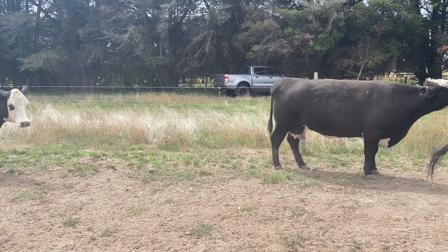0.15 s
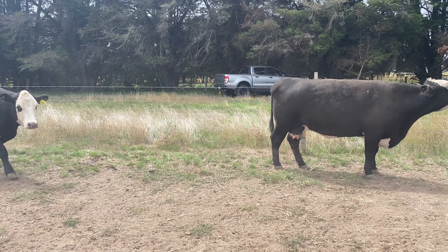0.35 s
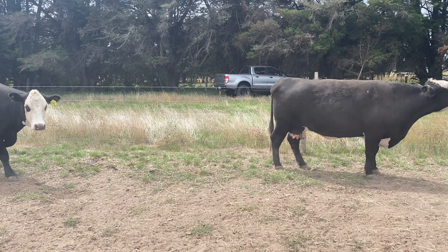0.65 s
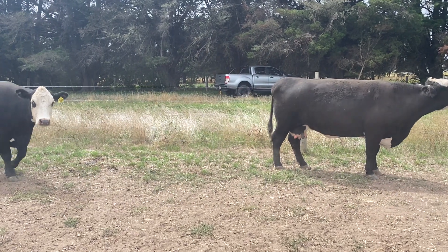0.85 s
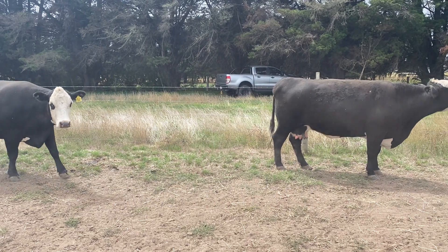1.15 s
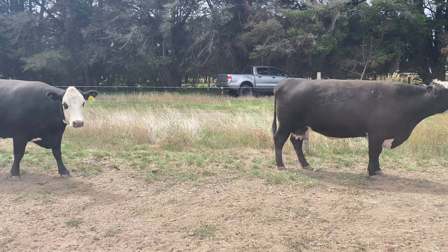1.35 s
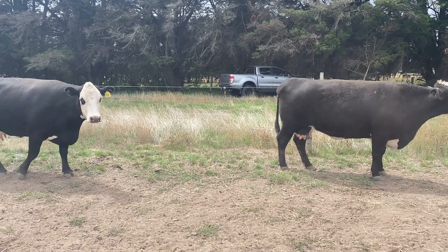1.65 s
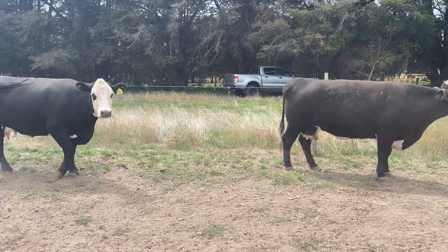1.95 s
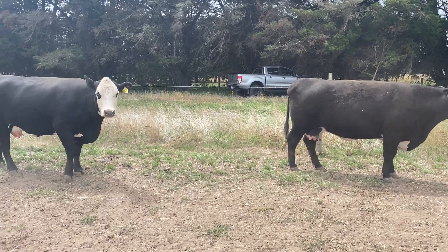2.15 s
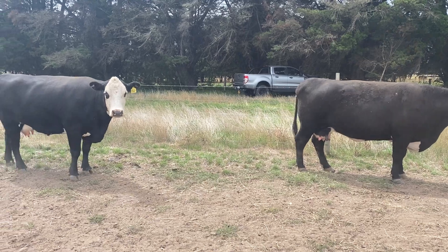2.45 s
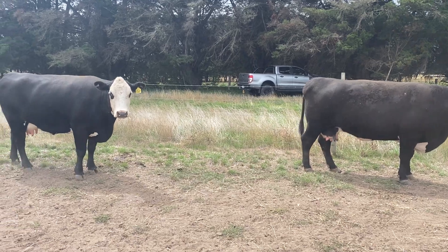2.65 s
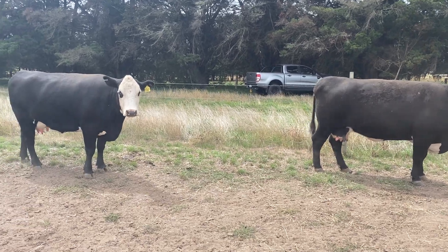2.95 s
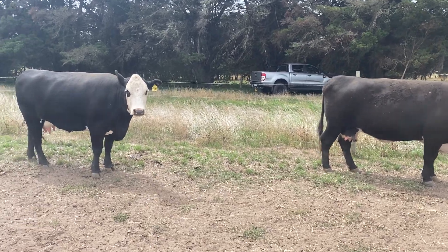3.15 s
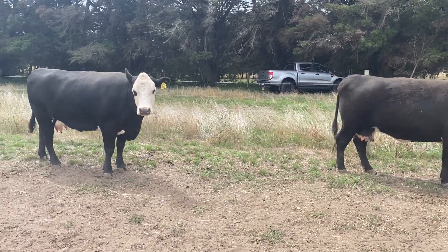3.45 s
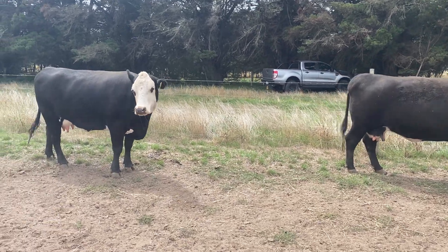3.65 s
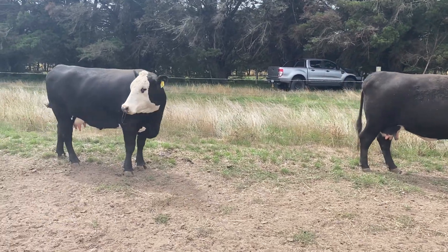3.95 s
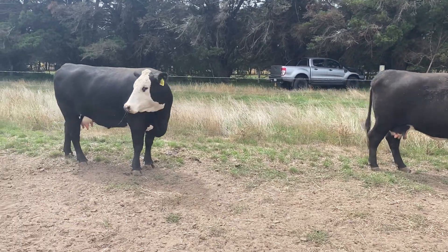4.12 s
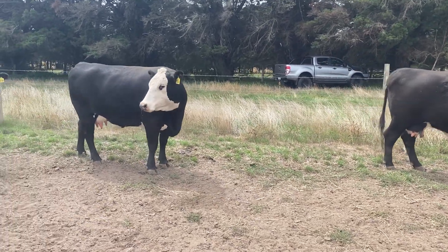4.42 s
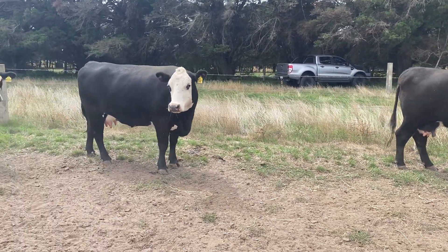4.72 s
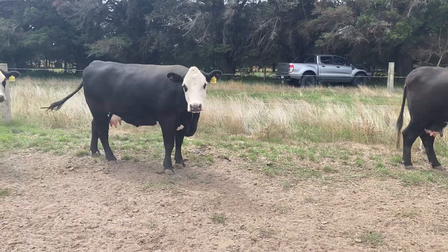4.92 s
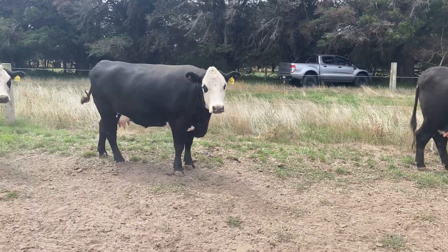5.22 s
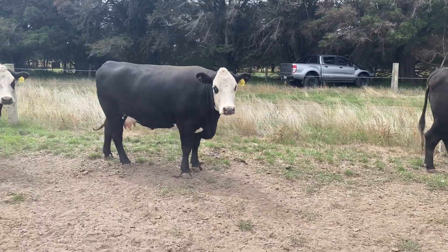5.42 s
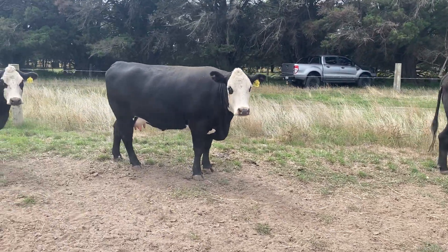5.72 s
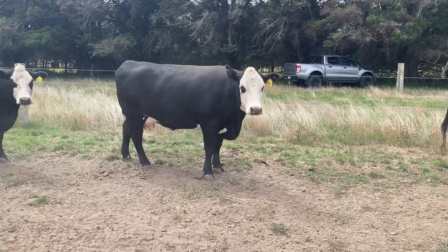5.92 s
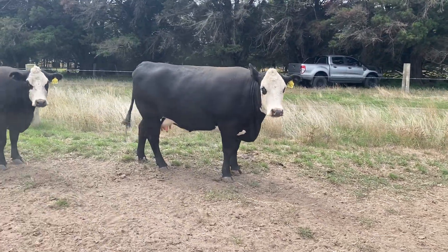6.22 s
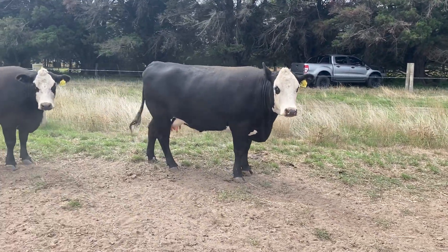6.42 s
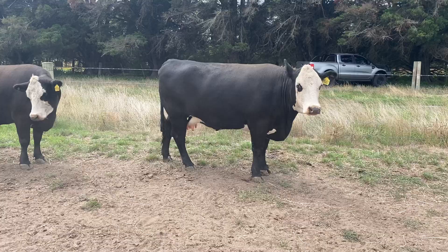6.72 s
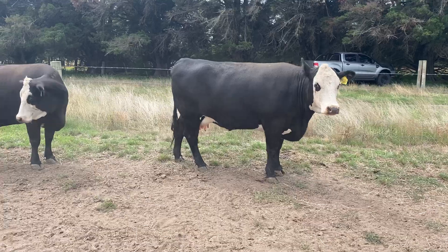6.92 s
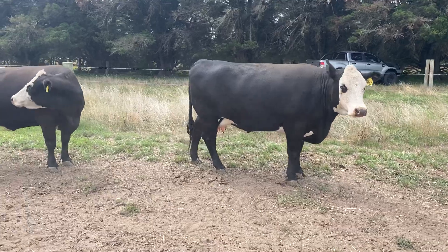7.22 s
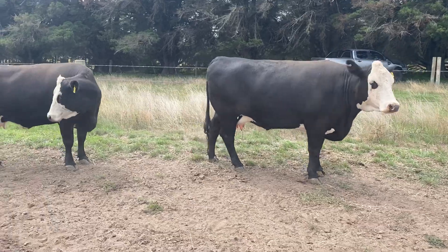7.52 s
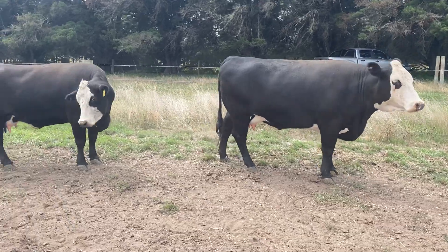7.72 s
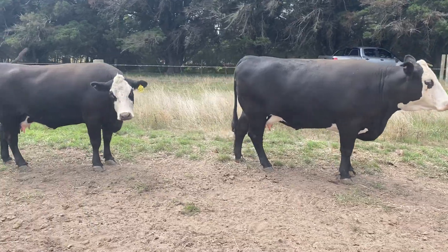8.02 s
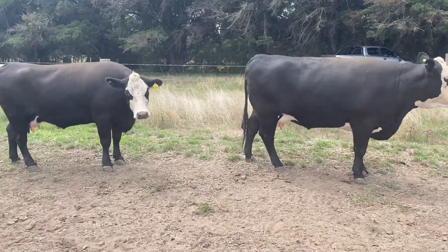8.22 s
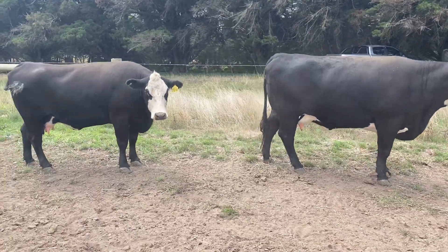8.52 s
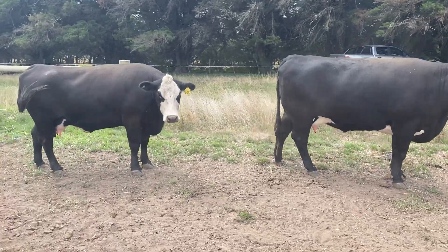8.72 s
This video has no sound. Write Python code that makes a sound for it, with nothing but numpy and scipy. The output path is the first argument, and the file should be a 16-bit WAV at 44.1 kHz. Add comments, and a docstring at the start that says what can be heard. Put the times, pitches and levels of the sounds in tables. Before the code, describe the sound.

In an open dry paddock edged by trees, one cow bellows short and hoarse about once a second throughout. Early on, a nasal cow and breathy rising moos answer from the left, with two higher broken bawls. After the middle these thin out and a close cow hums through a shut mouth. Faint creaky throat sounds and a soft hoof thud sit between. Stereo handheld microphone outdoors, thin tree echo, low murmur beneath.

```python
"""Cattle calling across a paddock

One cow bellows about once a second; a nasal cow and a close, closed-mouth cow answer, and two more bawl further off.
Every call is a train of vocal-fold closures, each a click and a puff of noise ringing in a throat.
Between the calls there are slow creaks and soft hoof falls, over a low murmur of far cattle and moving air.
Two microphone ports hear each direction differently; the tree line and the stubble return a thin echo."""
import sys
import numpy as np
from scipy import signal
from scipy.fft import rfft, irfft, next_fast_len
from scipy.io import wavfile
from scipy.ndimage import uniform_filter1d

SR = 44100
rng = np.random.default_rng(int(sys.argv[2]) if len(sys.argv) > 2 else 0)


def output_pcm(signal):
    """Save a mono or channel-first signal as 16-bit PCM at the path in sys.argv[1].

    Samples are clipped to [-1, 1] before scaling.
    """
    pcm = np.clip(np.atleast_2d(signal).T, -1, 1) * 32767
    wavfile.write(sys.argv[1], SR, np.round(pcm).astype(np.int16))


N = 391166
TIME = np.arange(N) / SR
RING_SIZE = 2048   # samples for which one closure rings
RING_HZ = np.arange(RING_SIZE // 2 + 1) * SR / RING_SIZE

NOISY_ABOVE_HZ = 1350   # where the breath noise reaches the set rasp
FLUTTER, FLUTTER_PER_S = .003, 22   # the pitch trembles by this share, this often
RATTLE = .008   # extra unevenness of slack folds, as a share of a cycle
HOARSE_DB, HOARSE_LAG = 5, .05   # strong-weak beat of fully slack folds, and its delay as a share of a cycle
JAW_RING_Q = 7.2   # sharpness of the resonance set by the jaw
SWEEP_WIDTH = 0.1   # half-width of the gliding resonance, as a share of its frequency
CATCH_S = 0.041   # how long the voice falters to each side of the catch
JAW_WIDER_S, JAW_WIDE_S, TURNS_TO_FRONT_S = 4, 7, 6   # when the bellowing cow changes jaw and place
CLOSE_ECHO_DB, DISTANT_ECHO_DB = -14.5, -7.5   # how strongly the tree line is fed
NEAR_SCATTER_DB = -1   # treble thrown back by stubble and flanks round a close cow
CUTOFF_HZ = 12400


def from_db(db):
    """Turn decibels into gain."""
    return 10 ** (np.asarray(db) / 20)


def at_hz(table, hz, axis=1):
    """Read a column of a table along log frequency."""
    table = np.array(table, float)
    return np.interp(np.log(hz + 1), np.log(table[:, 0]), table[:, axis])


def ramp(x):
    """Step smoothly from 0 to 1."""
    return np.sin(np.pi / 2 * np.clip(x, 0, 1)) ** 2


def band_pass(x, band_hz):
    """Keep only the sound within a band."""
    return signal.sosfilt(signal.butter(2, band_hz, "band", fs=SR, output="sos"), x)


def causal(db):
    """Give these gains a minimum-phase response: it rings only after it is struck."""
    cepstrum = irfft(np.log(from_db(db)))
    cepstrum[..., 1:RING_SIZE // 2] *= 2
    cepstrum[..., RING_SIZE // 2 + 1:] = 0
    return np.exp(rfft(cepstrum))


def ports(x, direction, lag_s):
    """Sound bends round the housing and reaches each port with its own phase and strength; the treble just lags."""
    size = next_fast_len(N + RING_SIZE)
    hz = np.arange(size // 2 + 1) * SR / size
    lead = at_hz(direction, hz, axis=1) * np.minimum(hz / direction[0][0], 1)
    lead -= 2 * np.pi * lag_s * np.maximum(hz - direction[-1][0], 0)
    level_difference_db = at_hz(direction, hz, axis=2)
    # Each port takes half of the difference, in opposite senses
    half = from_db(level_difference_db / 2) * np.exp(.5j * lead)
    return irfft(rfft(x, size) * np.array([half, 1 / half]), size)[:, :N]


# How the two ports hear the left: (frequency [Hz], lead of the left port [rad], left minus right level [dB])
FROM_LEFT_SIDE = [(100, -0.8, 1), (260, -1.3, -3), (500, -1.9, -1), (750, -2.4, -1), (1020, -2.6, 3),
                  (1250, -4.0, -3), (1500, -5.0, -5), (2100, -6.1, -4), (3000, -6.1, 2)]


def from_left(x):
    """Place a sound on the left, where the herd is."""
    return ports(x, FROM_LEFT_SIDE, lag_s=.0005)


def gesture(row, ease, drop, drop_s, drop_bend, swelling, attack_s, attack_db, release_s, release_db,
            push_db, closing_db, sweep_hz, sweep_db, edge_db):
    """Pitch climbs and flattens as the voice swells and the mouth moves; then pitch collapses and the mouth closes.

    Rows: (time [s], pitch [Hz], level [dB], mouth [dB], gliding resonance [Hz], its lift [dB], top treble [dB])."""
    start, length, start_hz, top_hz, climb, level_db, swell_db, mouth_db, opening_db = row
    t = np.linspace(0, length, 100)
    left = length - t
    along = t / length

    to_climb = np.clip(1 - along / climb, 0, 1) ** ease
    collapse = np.clip(1 - left / drop_s, 0, 1) ** drop_bend
    pitch = (top_hz - (top_hz - start_hz) * to_climb) * (1 - drop * collapse)

    unswollen = 1 - ramp(along / swelling)
    onset_db = attack_db * np.maximum(1 - t / attack_s, 0)
    ending_db = release_db * np.maximum(1 - left / release_s, 0)
    last_push_db = push_db * ramp(np.sqrt(collapse))
    level = level_db - swell_db * unswollen + last_push_db - onset_db - ending_db
    mouth = mouth_db - opening_db * unswollen - closing_db * collapse

    glide_hz = np.interp(along, [0, 1], sweep_hz)
    glide_db = np.interp(along ** 2, [0, 1], sweep_db)
    return np.transpose([start + t, pitch, level, mouth, glide_hz, glide_db, -edge_db * unswollen])


def trail_off(call, tail_s=0.044, sag=0.64, drop_db=10, shut_db=14):
    """After a call the folds flap on briefly, slower and softer, while the mouth shuts."""
    s, hz, level_db, mouth_db, *rest = call[-1]
    return [*call, (s + tail_s, hz * sag, level_db - drop_db, mouth_db - shut_db, *rest)]


def closures(call, jitter, slack_jitter=0.008):
    """Times at which the folds snap shut; they tremble, and beat unevenly at low pitch and when it collapses."""
    s, hz = np.transpose(call)[:2]
    t = np.arange(s[0], s[-1], 1 / SR)
    pitch = uniform_filter1d(np.interp(t, s, hz), size=1000, mode="nearest")   # muscles round off every bend
    knots = np.arange(s[0], s[-1] + 1, 1 / FLUTTER_PER_S)
    tremble = 1 + FLUTTER * np.interp(t, knots, rng.standard_normal(len(knots)))
    cycles = np.cumsum(pitch * tremble) / SR + rng.random()
    at = np.flatnonzero(np.diff(np.floor(cycles)))   # one closure per whole cycle

    falling = np.clip(-np.gradient(np.log(pitch))[at] * SR / 4, 0, 1) ** 2
    loose = 1 - pitch[at] / pitch.max()
    late = HOARSE_LAG * loose * (np.arange(len(at)) % 2)   # every other beat
    unevenness = jitter + RATTLE * loose + slack_jitter * falling
    return t[at] + (late + unevenness * rng.standard_normal(len(at))) / pitch[at]


def tract_db(throat, pitch, mouth_db, sweep_hz=500, sweep_db=0, edge_db=0, spacing_hz=735,
             reflection=.5, top_db_per_octave=-20):
    """Throat colour, with one gliding resonance and a row of upper tube resonances that wander as the mouth moves."""
    spacing = spacing_hz * (1 + .005 * np.cumsum(rng.standard_normal(pitch.shape), axis=0))
    tube_db = -20 * np.log10(np.abs(1 - reflection * np.exp(2j * np.pi * RING_HZ / spacing)))
    upper = np.clip(RING_HZ / 1500 - 1, 0, 1)
    opening = 1 - 1 / (1 + (RING_HZ / 600) ** 4)   # an open mouth lets the upper resonances out
    gliding_db = sweep_db / (1 + ((RING_HZ / sweep_hz - 1) / SWEEP_WIDTH) ** 2)
    edge = np.clip(RING_HZ / 3000 - .8, 0, 1)   # harder closures add the top treble
    low_cut_db = -10 * np.log10(1 + (55 / (RING_HZ + 10)) ** 6)
    top_db = top_db_per_octave * np.log2(np.maximum(RING_HZ / throat[-1][0], 1))
    moving_db = tube_db * upper + mouth_db * opening + gliding_db + edge_db * edge
    return at_hz(throat, RING_HZ) + moving_db + low_cut_db + top_db


def moo(call, throat, jitter, rasp, doubling_db=0, puff_s=0.009, fade_s=0.005):
    """One call: each closure is a click and a puff of turbulence, both ringing in the throat."""
    call = trail_off(call)
    s, *columns = np.transpose(call)
    when = closures(call, jitter)
    when = when[when > 0]
    pitch, level_db, *mouth = (np.interp(when, s, c)[:, None] for c in columns)

    start, fraction = np.divmod(when * SR, 1)
    click = np.exp(-2j * np.pi * RING_HZ / SR * fraction[:, None])   # placed between samples
    dying = np.exp(-np.arange(RING_SIZE) / SR / puff_s)
    puff = rfft(rng.standard_normal((len(when), RING_SIZE)) * dying / np.linalg.norm(dying))
    turbulence = rasp * (RING_HZ / NOISY_ABOVE_HZ) ** 2   # the treble is the noisiest part
    source = (click + turbulence * puff) / np.sqrt(1 + turbulence ** 2 / 2)

    fade = np.clip(np.minimum(when - s[0], s[-1] - when) / fade_s, 0, 1)[:, None]
    hoarse_db = HOARSE_DB * (1 - pitch / pitch.max())
    shimmer_db = (2 * rasp + hoarse_db / 2) * rng.standard_normal(pitch.shape)
    # A hoarse voice alternates strong and weak closures
    shimmer_db += (doubling_db + hoarse_db) * (-1) ** np.arange(len(when))[:, None]
    # Slower closures are stronger, so that each harmonic keeps its level
    strength = fade * from_db(level_db + shimmer_db) * SR / (np.sqrt(2) * pitch)

    pulses = irfft(source * strength * causal(tract_db(throat, pitch, *mouth)))
    out = np.zeros(N + SR)
    for i, pulse in zip(start.astype(int), pulses):
        out[i:i + RING_SIZE] += pulse
    return out[:N]


def jaw_ring(x, hz, db):
    """The set of the jaw lifts one resonance for the length of a call."""
    peak = signal.iirpeak(hz, JAW_RING_Q, fs=SR)
    return x + (from_db(db) - 1) * signal.lfilter(*peak, x + 1e-18)   # the tiny offset keeps the filter fast


def ringing_moos(table, habit, throat, **voice):
    """All calls of one table, each with its own jaw resonance."""
    total = np.zeros(N)
    for *row, ring_hz, ring_db in table:
        total += jaw_ring(moo(gesture(row, **habit), throat, **voice), ring_hz, ring_db)
    return total


# A habit shapes all calls of one voice. Times end in _s, levels in _db.
# ease: how the climb flattens; drop: share of pitch lost at the end; drop_bend: how sharply it bends;
# swelling: share of the call spent swelling; attack/release: how much softer the very start and end are;
# push: last push of air; closing: treble lost as the mouth closes;
# sweep: one resonance and its lift, from start to end; edge: how much the top treble grows
NASAL_HABIT = dict(
    ease=1.8, drop=.2, drop_s=.11, drop_bend=2, swelling=0.56,
    attack_s=0.06, attack_db=16, release_s=0.044, release_db=15, push_db=4, closing_db=4.5,
    sweep_hz=(1840, 1180), sweep_db=(7, 2), edge_db=4.5)
# Nasal calls. Levels are before throat colour; a negative rise is a fall:
# (time [s], length [s], starting pitch [Hz], top pitch [Hz], share of the call spent climbing,
#  level [dB], swell up to it [dB], mouth opening as treble lift [dB], rise of that opening on the way [dB])
NASAL_CALLS = [ (-0.22, 0.62, 122.4, 158.9, 0.87, -27, 9.2, -0.68, 6),
               (1.23, 0.55, 122.8, 165.3, 0.89, -25.5, 7.5, 0, 3),
               (2.76, 0.64, 128.7, 161.9, .92, -25, 6.9, 0.088, 6),
               (4.66, 0.59, 133.8, 153.5, 0.86, -22.5, 6.2, -1.1, 2), ]
# Colour of the nasal throat: (frequency [Hz], level [dB])
NASAL_COLOUR = [(80, -24), (155, -2), (310, -15.5), (470, -3.5), (630, -17.5), (780, -19.5), (950, -16.5),
                (1100, -13), (1450, -23), (1720, -26), (1930, -46), (2200, -35), (2600, -47), (3000, -54.5)]


def nasal_cow():
    """Steady folds ring in a nasal throat, with little breath noise."""
    return sum(moo(gesture(row, **NASAL_HABIT), NASAL_COLOUR, jitter=.0006, rasp=.09) for row in NASAL_CALLS)


def catch(call, share, dip_db):
    """Partway through, the voice shifts register: its body drops out briefly while the rasp goes on."""
    s, hz, level_db, mouth_db, *rest = call.T
    dip = dip_db * np.exp(-((s - s[0] - share * (s[-1] - s[0])) / CATCH_S) ** 2)
    return np.transpose([s, hz, level_db - dip, mouth_db + dip / 2, *rest])


# Colour of a throat behind a shut mouth: (frequency [Hz], level [dB])
SHUT_MOUTH_COLOUR = [(70, -18.5), (140, -1), (180, -5.5), (232, 8), (285, -2.5), (340, -11.5), (430, -14.5),
                     (570, -12), (750, -29.5), (950, -28), (1130, -20), (1300, -35), (1700, -58.5),
                     (2500, -48), (3200, -74.5), (4300, -71)]


def closing_grunt(s, length_s=.085, first_hz=85, last_hz=52, level_db=-39, fade_db=5):
    """The last air of a bellow leaves through a shut mouth."""
    rows = [(s, first_hz, level_db, 0), (s + length_s, last_hz, level_db - fade_db, 0)]
    return moo(rows, SHUT_MOUTH_COLOUR, jitter=.01, rasp=.1)


BELLOW_HABIT = dict(
    ease=1.8, drop=0.31, drop_s=.15, drop_bend=3.5, swelling=0.64,
    attack_s=0.12, attack_db=9.5, release_s=0.02, release_db=15, push_db=-2, closing_db=4,
    sweep_hz=(585, 473), sweep_db=(2, 9), edge_db=6.5)
# The insistent cow starts as a rattle, catches, swells into full voice and drops. Columns of the nasal calls, then
# (jaw resonance [Hz], its lift [dB], share of the call at which the voice catches, dip there [dB],
#  spacing of the upper resonances at the start [Hz], at the end [Hz])
BELLOW_CALLS = [ (-0.16, 0.5, 74.6, 140.9, .7, -28.5, 0.54, 2.5, 21, 1070, 4, .4, 1.8, 910, 895),
                (0.745, 0.44, 81.96, 140.3, .6, -26, 1.1, 4.5, 13, 1113, 3.5, 0.26, 2.2, 884, 867),
                (1.59, 0.45, 81.9, 138, .66, -25.5, 1, 6, 16.5, 1013, 2.5, 0.55, 3.1, 857, 947),
                (2.41, 0.5, 73.58, 137.7, .61, -23.5, 5.4, 3, 3, 575, 3.7, .42, 2.5, 925, 910),
                (3.31, 0.53, 72.93, 135.9, .65, -25, 5.9, 0.5, -1, 651, 12, 0.49, 3.2, 870, 835),
                (4.2, 0.55, 58.97, 133.9, .69, -22.5, 7.7, -0.5, 0.5, 764, 4.8, .53, 5, 892, 910),
                (5.219, 0.46, 80.37, 133.2, .65, -21.5, 6.4, 1, -2, 687, 7.8, 0.45, 5.2, 935, 900),
                (6.089, 0.554, 63.3, 134.5, .654, -19.5, 10, -0.5, -1.5, 1105, 9.6, .49, 6.4, 713, 800),
                (7.025, 0.49, 61.67, 130.3, .7, -23, 7, 0, 0, 1080, 2, .5, 3.2, 668, 660),
                (7.895, 0.5, 69.5, 132.6, .69, -21.5, 10, 0.5, -7.5, 840, 2.1, .48, 6.6, 726, 716),
                (8.769, 0.61, 59.8, 137.4, 0.62, -21, 11, 7, 1.5, 244, 1.9, .47, 6, 735, 705), ]
# Her throat as the jaw opens, from narrow to wide: (frequency [Hz], level [dB])
NARROW_JAW_COLOUR = [(70, -16.5), (140, -6.5), (275, -8), (335, -9.5), (415, 1), (460, -0.5), (550, -9),
                     (600, -16), (680, -17.5), (740, -28), (830, -9.5), (890, -29.5), (970, -16.5),
                     (1100, -18.5), (1220, -30), (1550, -28.5), (1850, -52), (2200, -36), (2450, -55.5),
                     (2640, -43), (2950, -72.5), (3300, -54), (3700, -55), (4500, -71), (6200, -74.5)]
WIDER_JAW_COLOUR = [(70, -4.5), (130, -12), (170, -4.5), (240, 3), (310, -20.5), (400, -5.5), (460, 1),
                    (530, -4), (600, -16), (670, -15.5), (800, -13.5), (910, -31), (1060, -16.5),
                    (1350, -35.5), (1600, -35.5), (1850, -49), (2250, -38.5), (2800, -60), (3200, -58),
                    (3700, -55.5), (6300, -71.5)]
WIDE_JAW_COLOUR = [(70, -0.5), (130, -5.5), (170, -3.5), (228, 6), (265, 0.5), (300, -13), (380, -15),
                   (450, -5), (520, 0), (660, -10), (790, -6), (1050, -21), (1400, -17), (1600, -27),
                   (1820, -45), (2230, -30), (2550, -38), (3100, -45.5), (3950, -49), (4400, -58),
                   (5100, -57), (6000, -63.5), (8000, -72)]


def bellowing_cow():
    """Her jaw opens as she keeps on, her upper resonances slide as her neck stretches; later bellows come from the front."""
    left, front = np.zeros(N), np.zeros(N)
    for *row, ring_hz, ring_db, catch_at, catch_db, first_spacing_hz, last_spacing_hz in BELLOW_CALLS:
        begins = row[0]
        if begins < JAW_WIDER_S:
            throat = NARROW_JAW_COLOUR
        elif begins < JAW_WIDE_S:
            throat = WIDER_JAW_COLOUR
        else:
            throat = WIDE_JAW_COLOUR
        place = left if begins < TURNS_TO_FRONT_S else front
        call = catch(gesture(row, **BELLOW_HABIT), catch_at, catch_db)
        spacing_hz = np.linspace(first_spacing_hz, last_spacing_hz, len(call))
        call = np.column_stack([call, spacing_hz])
        place += jaw_ring(moo(call, throat, jitter=.0016, rasp=.16, fade_s=.03), ring_hz, ring_db)
        place += closing_grunt(call[-1][0])
    return left, front


# Level of the murmur, to which its colour is added: (time [s], level [dB])
MURMUR_LEVEL = [(0, -60), (3.9, -59.5), (4.05, -63), (4.6, -57), (5.7, -58), (6.1, -60.5), (6.95, -66.5),
                (7.5, -59), (8.87, -58.5)]
# Colour of the murmur: (frequency [Hz], level [dB])
MURMUR_COLOUR = [(25, -36), (45, -12), (80, -3), (240, -4), (400, -15.5), (1650, -24.5), (2000, -37),
                 (3000, -50.5), (6500, -69.5), (8400, -50), (9000, -71)]


def wash():
    """Far cattle and moving air blur into a low murmur: coloured noise, half from the herd's side, half from all round."""
    size = next_fast_len(N)
    hz = np.arange(size // 2 + 1) * SR / size
    colour = from_db(at_hz(MURMUR_COLOUR, hz)) * np.sqrt(SR / 2)
    noise = irfft(rfft(rng.standard_normal((3, size))) * colour, size)[:, :N]
    level = from_db(np.interp(TIME, *np.transpose(MURMUR_LEVEL)))
    return level * (from_left(noise[2]) + noise[:2]) / np.sqrt(2)


BAWL_HABIT = dict(
    ease=3, drop=0.021, drop_s=0.019, drop_bend=2.1, swelling=0.78,
    attack_s=0.15, attack_db=-2, release_s=0.0095, release_db=4, push_db=-0.5, closing_db=10,
    sweep_hz=(900, 2340), sweep_db=(-1.5, 7), edge_db=2.5)
# Calls in a broken, upper register. Columns of the nasal calls, then (jaw resonance [Hz], its lift [dB])
BAWL_CALLS = [ (0.3, 0.57, 222.7, 251.6, 1, -20.5, 33.2, 0.88, -15, 1567, 7.8),
              (4.619, 0.67, 213.6, 251.7, .91, -24.5, 9.4, 8.4, 6, 2040, 4.5), ]
# Colour of the bawling throat: (frequency [Hz], level [dB])
BAWL_COLOUR = [(120, -24.5), (250, -9.5), (500, -1), (750, -3), (1000, -3.5), (1250, -12.5), (1500, -25),
               (1750, -21), (2050, -34), (2500, -41), (2800, -52), (3200, -66.5), (3900, -48),
               (4600, -60.5), (5600, -87.5), (6500, -72.5)]


def high_bawling_cow():
    """The voice has broken into its upper register, so the folds close about twice as fast."""
    return ringing_moos(BAWL_CALLS, BAWL_HABIT, BAWL_COLOUR, jitter=.004, rasp=.15, fade_s=.03)


RISING_HABIT = dict(
    ease=1.3, drop=.24, drop_s=0.093, drop_bend=2.5, swelling=0.9,
    attack_s=0.023, attack_db=5.5, release_s=0.082, release_db=18, push_db=8.5, closing_db=13.5,
    sweep_hz=(740, 815), sweep_db=(1, 2.5), edge_db=1)
# Rising calls further off. Columns of the nasal calls, then (jaw resonance [Hz], its lift [dB])
RISING_CALLS = [ (0.33, 0.52, 86.8, 172.9, .8, -16.5, 15.8, -10, -11, 336, 3.6),
                (1.33, 0.45, 90.8, 166.3, .75, -20, 13, -4.5, 9.5, 820, 1.7),
                (2.13, 0.54, 72, 162.4, .88, -17, 24.3, 8.5, 12, 187, 4),
                (3.2, 0.46, 84.8, 165.6, 0.82, -15, 17, 5.5, 16.5, 809, 2.1),
                (4.15, 0.53, 78, 165.5, .8, -16, 19.5, 16, 11, 815, 2.2),
                (5.24, 0.51, 88, 160, 0.8, -17.5, 9, 13, 14.5, 802, 3.6), ]
# Colour of the rising cow's throat: (frequency [Hz], level [dB])
RISING_COLOUR = [(70, -30.5), (160, -8), (240, 1.5), (320, -17.5), (390, -23.5), (480, -14), (640, -19.5),
                 (800, -18.5), (950, -32), (1600, -52.5), (2100, -61), (3500, -96.5)]


def rising_cow():
    """A breathy voice climbs in pitch; strong and weak closures take turns."""
    return ringing_moos(RISING_CALLS, RISING_HABIT, RISING_COLOUR, jitter=.003, rasp=.22, doubling_db=1)


# Slow creaks of the distant cattle, before throat colour:
# (time [s], length [s], first pulse rate [Hz], last pulse rate [Hz], level [dB])
CREAK_CALLS = [(0.367, 0.27, 48, 50, -45.5), (1.108, 0.11, 55, 48, -48.5), (1.797, .6, 52, 44, -51.5),
               (3.418, .55, 60, 50, -48.5), (4.087, 0.15, 38, 29, -56), (5.619, .36, 52, 57, -51)]
# Colour of the hollow throat: (frequency [Hz], level [dB])
CREAK_COLOUR = [(120, -13), (240, -0.5), (330, -24.5), (470, -0.5), (600, -19.5), (780, 5.5), (900, -3),
                (1200, -1), (1330, -15.5), (1510, -9.5), (1750, -20.5), (1920, -44), (3000, -59.5)]


def creaks():
    """Slack folds tick slowly and unevenly in a hollow throat."""
    total = np.zeros(N)
    for start, length, first_hz, last_hz, level_db in CREAK_CALLS:
        rows = [(start, first_hz, level_db, 0), (start + length, last_hz, level_db, 0)]
        total += moo(rows, CREAK_COLOUR, jitter=.09, rasp=1.1)
    return total


# Soft hoof falls on dry earth: (time [s], level [dB])
HOOF_FALLS = [(3.17, -31), (7.75, -36)]


def hooves(thud_hz=(45, 130), decay_s=0.088):
    """A hoof presses a short, dull thud out of the ground: a dying burst of low noise."""
    push = np.zeros(N)
    for s, db in HOOF_FALLS:
        push += from_db(db) * (TIME > s) * np.exp(-np.abs(TIME - s) / decay_s)
    earth = band_pass(push * rng.standard_normal(N), thud_hz)
    return earth * np.sqrt(SR / 2 / (thud_hz[1] - thud_hz[0]))   # make up for the narrow band


HUM_HABIT = dict(
    ease=1.8, drop=0.25, drop_s=0.092, drop_bend=2.1, swelling=0.87,
    attack_s=0.25, attack_db=4.5, release_s=0.028, release_db=13.5, push_db=-3, closing_db=6,
    sweep_hz=(1100, 1190), sweep_db=(3, 1), edge_db=7)
# Close calls with the mouth shut. Columns of the nasal calls, then (jaw resonance [Hz], its lift [dB])
HUM_CALLS = [ (5.27, 0.36, 67.7, 98, 1, -38, -4, 3, -1, 87.5, 18),
             (5.551, 0.55, 99.26, 110.9, .7, -35, -4.5, 7.5, 5.5, 209, 4.5),
             (6.629, 0.28, 91.4, 97.5, .7, -42.5, -2, 7.5, 0, 191.7, 14),
             (6.88, 0.23, 64.4, 78.7, .8, -54, 3, 6.5, 0, 1144, 11),
             (7.3, 0.61, 118.9, 146.2, 0.72, -22, 6.5, 3.1, -2, 419, 6.5),
             (7.75, 0.39, 81.96, 97.8, .8, -39, 0.5, 2.5, -2, 177, 12),
             (8.39, 0.43, 112.7, 141.6, 0.55, -25.5, 3, 7, 7, 431, 6.5), ]


def humming_cow():
    """Clean, low moos come through a shut mouth."""
    return ringing_moos(HUM_CALLS, HUM_HABIT, SHUT_MOUTH_COLOUR, jitter=.001, rasp=.08)


def scattered(x, t60, band_hz, gap_s):
    """Ground, bodies and trunks scatter a thin echo within a band, different at each port."""
    t = np.arange(SR) / SR
    sparse = rng.standard_normal((2, SR)) * (rng.random((2, SR)) < .02)
    scatter = sparse * from_db(-60 * t / t60) * (t > gap_s)
    scatter /= np.linalg.norm(scatter, axis=1, keepdims=True)
    return signal.fftconvolve(x, band_pass(scatter, band_hz), axes=1)[:, :N]


# How the two ports hear three more directions:
# (frequency [Hz], lead of the left port [rad], left minus right level [dB])
FROM_HALF_LEFT_SIDE = [(140, -1.1, -1), (280, -1.2, -3.5), (420, -1.3, -2.5), (550, -1.7, 3),
                       (720, -2.2, 0), (970, -1.7, -3), (1400, -1.7, -2), (1800, -0.6, 0), (3000, -0.6, 2)]
FROM_THE_FRONT = [(100, -0.8, 1), (260, -1.5, -4), (520, -2.2, 1), (750, -2.8, 2), (1080, -2.4, 1),
                  (1450, -2.8, -4), (2200, -1.1, 2), (3000, 1.1, 3)]
FROM_CLOSE_BESIDE = [(140, -0.8, 1), (280, -0.7, -1), (430, -0.8, 8), (570, -3.6, 6), (800, -4.5, 2),
                     (1150, -4.5, -1), (1600, -4.7, -3), (2500, -7.1, 0)]


def scene():
    """Place every voice; distant ones feed the tree line's echo more than close ones."""
    distant = from_left(nasal_cow() + high_bawling_cow() + rising_cow() + creaks())
    bellows_left, bellows_front = bellowing_cow()
    close = ports(bellows_left, FROM_HALF_LEFT_SIDE, lag_s=.0005)
    close += ports(bellows_front, FROM_THE_FRONT, lag_s=.00023)
    close += ports(humming_cow() + hooves(), FROM_CLOSE_BESIDE, lag_s=0)

    to_trees = from_db(DISTANT_ECHO_DB) * distant + from_db(CLOSE_ECHO_DB) * close
    tree_line = scattered(to_trees, t60=0.3, band_hz=(30, 2200), gap_s=.0052)
    stubble = from_db(NEAR_SCATTER_DB) * scattered(close, t60=0.082, band_hz=(1900, 7000), gap_s=.0015)
    return distant + close + tree_line + stubble + wash()


def record(dry):
    """Cut the top steeply."""
    return signal.sosfilt(signal.cheby2(12, 70, CUTOFF_HZ, fs=SR, output="sos"), dry)


dry = scene()
out = record(dry)
output_pcm(out)
```